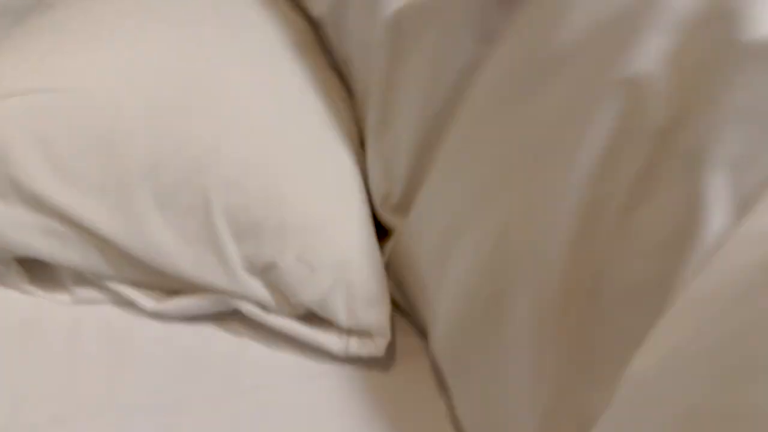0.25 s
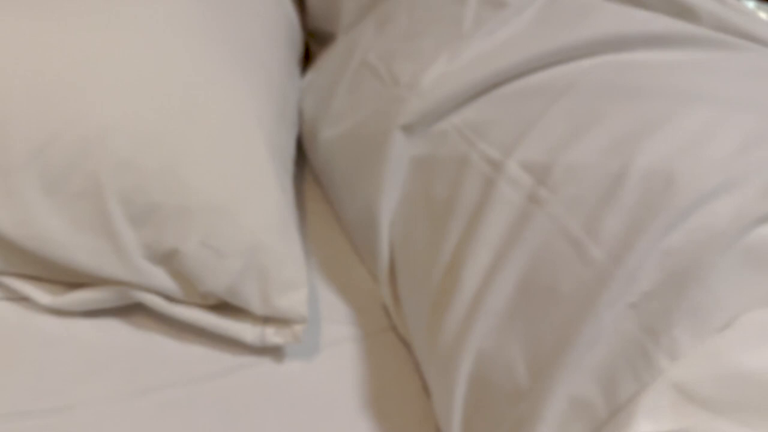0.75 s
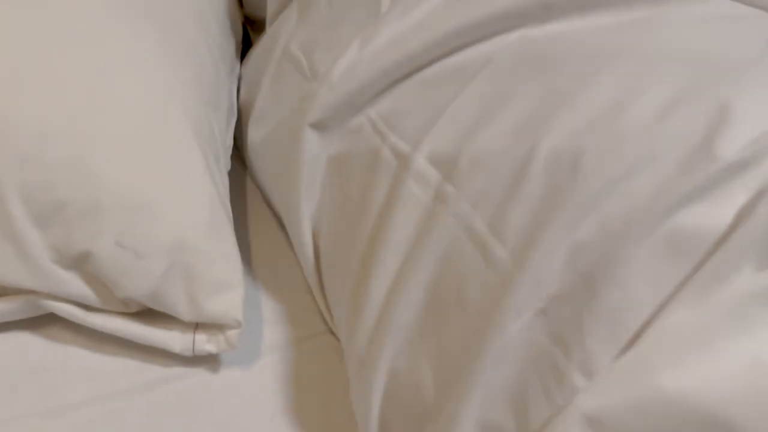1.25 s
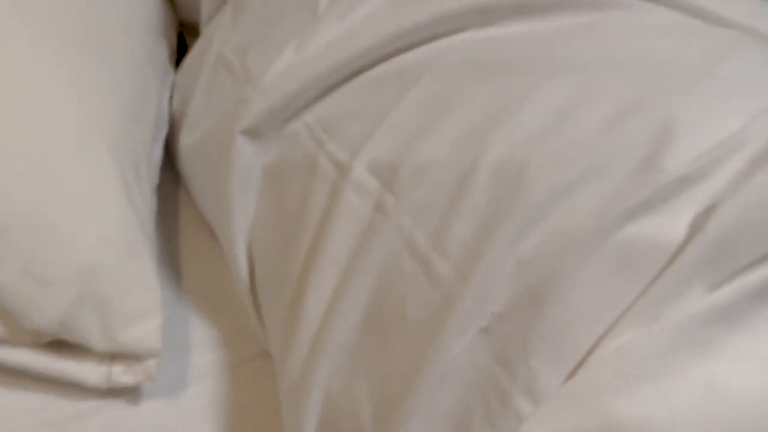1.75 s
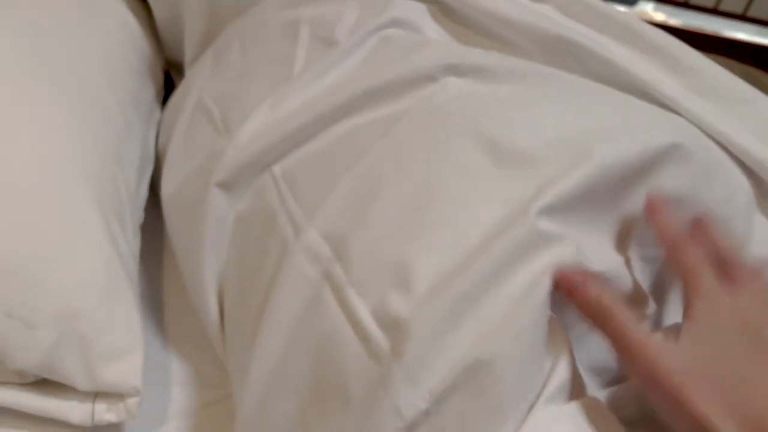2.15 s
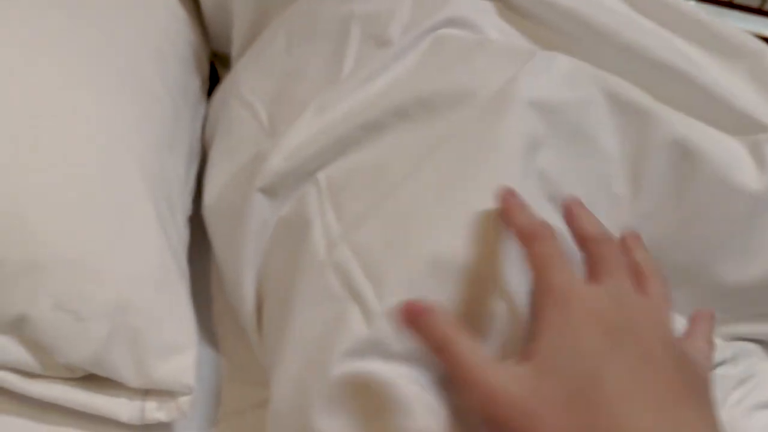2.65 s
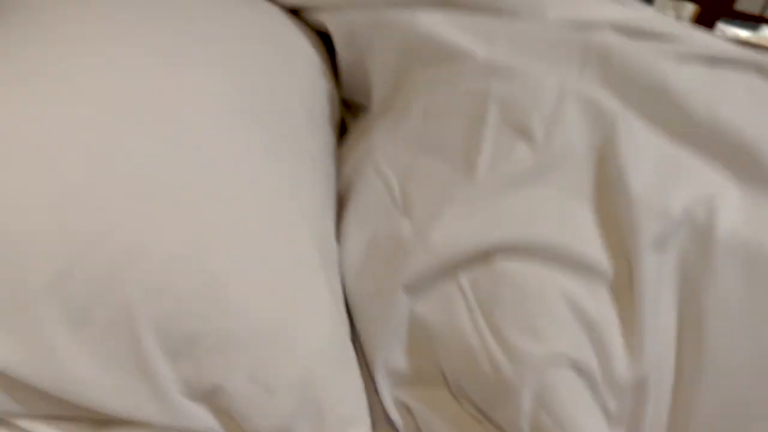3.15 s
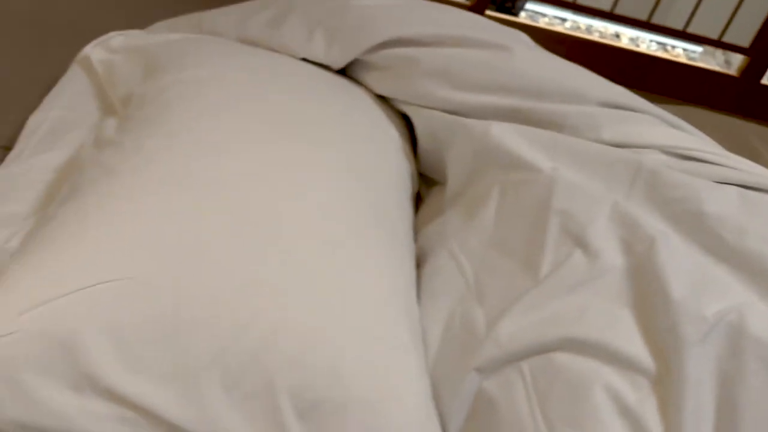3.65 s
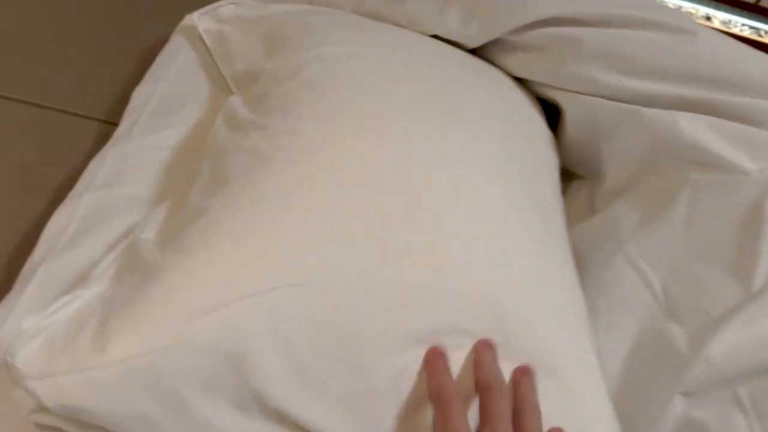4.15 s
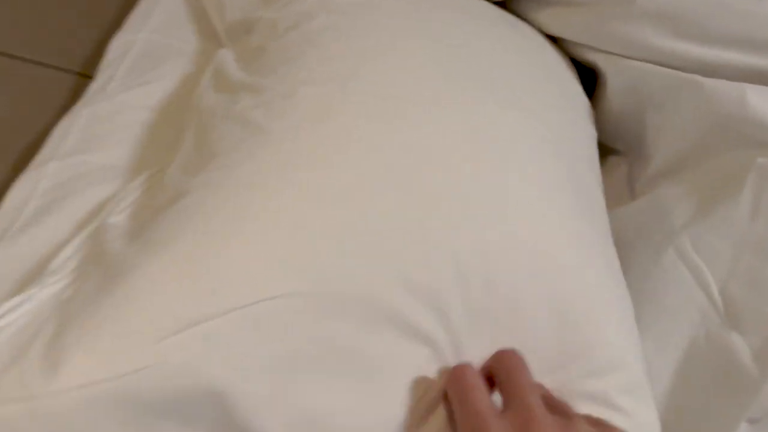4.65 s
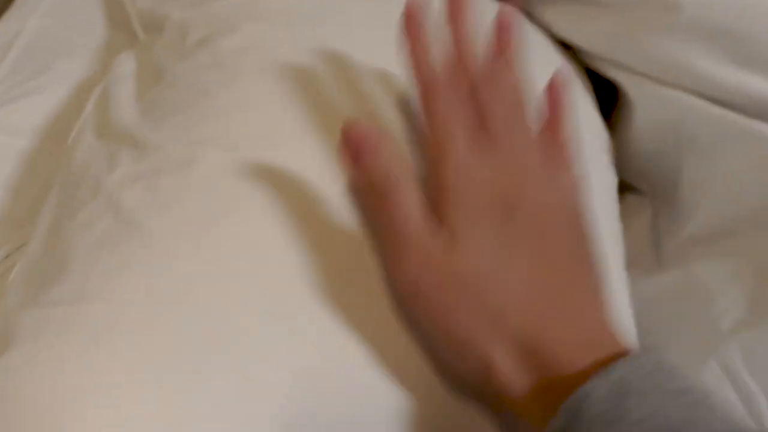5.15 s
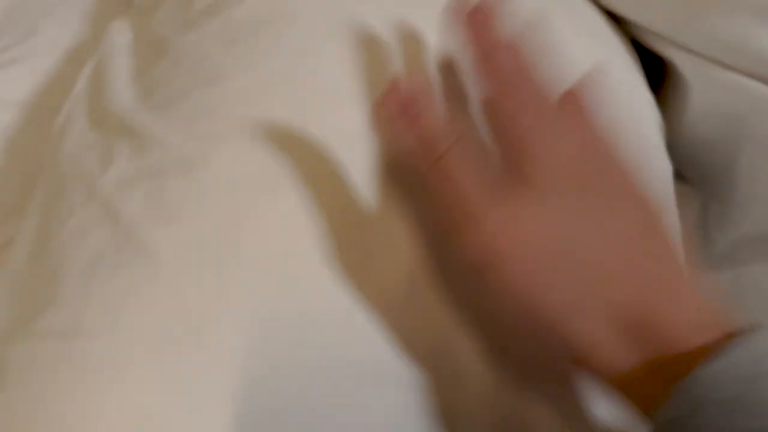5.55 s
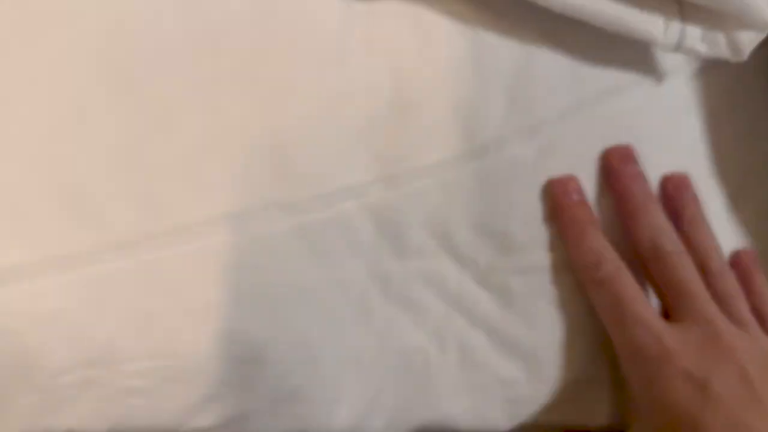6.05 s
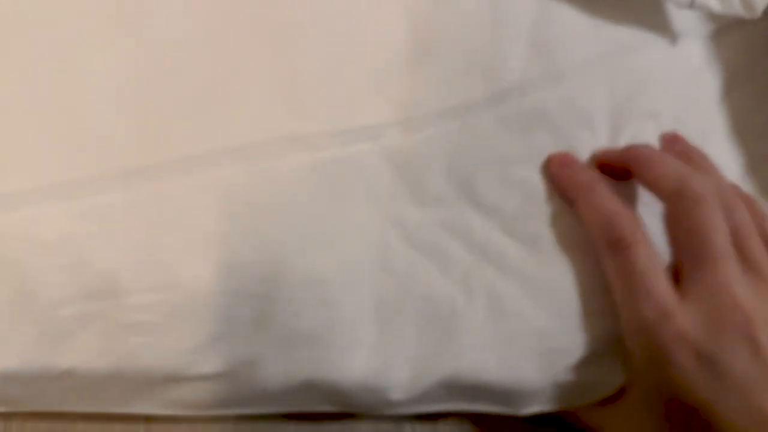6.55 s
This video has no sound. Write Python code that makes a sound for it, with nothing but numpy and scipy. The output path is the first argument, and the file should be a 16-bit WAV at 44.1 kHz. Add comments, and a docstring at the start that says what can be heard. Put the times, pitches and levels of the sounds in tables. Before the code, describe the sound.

Very close, dry stereo sound of bedding handled in a quiet room, over a soft low rumble. It opens with a muffled shove of the quilt and crisp cotton rustling, with small crease snaps until about 0.6 s. Lighter scrapes and faint low bumps continue to 1.6 s. At 1.9 s a cushioned pat thumps the quilt, followed by pressing strokes and duller thuds near 2.3, 2.75 and 3.1 s, with hissing cloth and crunching stuffing. Rustling thins around 3.5 to 4 s. Fingers brush the pillow from 4.2 s, and a tiny gliding squeak comes at 4.7 s. A soft low bump at 4.9 s leads to a hard slap at 5.2 s and the loudest at 5.4 s, deep, crackling and overloaded. Light rustle lingers, a small dull touch falls at 5.9 s, then from 6 s there is near silence with barely audible rubbing.

```python
"""In a quiet room, a hand pats and presses a quilt and a pillow close to a hand-held pair of microphones.
The cotton cover hisses and the stuffing crunches: both are random fibre slips, coloured band by band.
The palm and fingers land as damped knocks and a deep thump, creases snap, fingers brush and squeak, and
a low noise rumbles beneath. The hardest pat overloads the input; near the end all fades almost to silence."""
import sys
import numpy as np
from scipy import signal
from scipy.fft import rfft, irfft, next_fast_len
from scipy.io import wavfile

SR = 44100
rng = np.random.default_rng(int(sys.argv[2]) if len(sys.argv) > 2 else 0)


def store_wav(level_fs):
    """Save 16-bit WAV to argv[1]."""
    pcm = np.round(np.clip(np.atleast_2d(level_fs), -1, 1) * 32767)
    wavfile.write(sys.argv[1], SR, pcm.T.astype(np.int16))


N = 300321


def from_db(db):
    """Turn a level in dB into a gain."""
    return 10 ** (np.asarray(db) / 20)


def rms_one(x):
    """Scale a sound to an rms of 1."""
    return x / np.sqrt(np.mean(x ** 2) + 1e-20)


def in_time(rows):
    """Join the points of a table with straight lines; give each column one value per sample."""
    seconds, *columns = np.transpose(rows)
    return [np.interp(np.arange(N) / SR, seconds, column) for column in columns]


def at_hz(points, hz):
    """Read a table of (Hz, value) along a log-frequency axis."""
    table_hz, values = np.transpose(points)
    return np.interp(np.log(hz), np.log(table_hz + 1), values)


def drift(rate_hz):
    """Slow random wandering with an rms of 1, computed at every 40th sample and joined by lines."""
    r = np.exp(-80 * np.pi * rate_hz / SR)
    noise = rng.standard_normal(N // 40 + 2002)
    slow = signal.lfilter([1], [1, -2 * r, r * r], noise)[2000:]  # skip the start-up
    return np.interp(np.arange(N) / 40, np.arange(len(slow)), rms_one(slow))


def fibres(per_s):
    """Fibres slip at random moments with uneven force: sparse clicks in four unrelated streams."""
    slips = rng.random((4, N)) < per_s / SR
    return rms_one(rng.standard_normal((4, N)) * slips)


def coloured(streams, colour, patchy_db, patch_rate):
    """Half-octave bands, each with its own level, flicker and left-right likeness; rms 1 in all."""
    # How alike left and right are. Each row: frequency in Hz, likeness from 0 to 1.
    likeness = [(60, 0.99), (250, 0.84), (500, 0.23), (1000, 0.45), (2000, 0.21), (4000, 0.39),
                (8000, 0.32), (13000, 0.94)]
    out, together = 0, drift(patch_rate / 2)  # one drift is shared by all bands
    octaves = np.log2(colour[-1][0] / colour[1][0])
    edges = colour[1][0] * 2 ** np.arange(-1, octaves + .5, .5)
    edges = np.minimum(edges, .45 * SR)
    for k, (low, high) in enumerate(zip(edges, edges[1:])):
        band = signal.butter(2, [low, high], "band", fs=SR, output="sos")
        mid, side = signal.sosfilt(band, streams[k % 2::2])  # neighbouring bands use other streams
        hz = np.sqrt(low * high)
        alike = np.clip(at_hz(likeness, hz), 0, 1)
        flicker_db = patchy_db * (1.58 * together + drift(patch_rate))
        gain = from_db(at_hz(colour, hz) + flicker_db)
        out = out + gain * (np.sqrt(1 + alike) * mid + np.sqrt(1 - alike) * side * [[1], [-1]])
    return rms_one(out)


def knock(start_s, peak_db, hz, cycles, rise):
    """A damped swing: it builds over `rise` cycles and loses 60 dB in `cycles` cycles."""
    turn = np.arange(int(SR * .25)) / SR * hz
    swing = np.sin(2 * np.pi * turn) * (1 - np.exp(-turn / rise)) * from_db(-60 * turn / cycles)
    out, at = np.zeros(N), round(start_s * SR)
    out[at:at + len(swing)] = from_db(peak_db) * swing[:N - at] / np.max(np.abs(swing))
    return out


def strokes():
    """Power of hiss, crunch and bulk: every stroke rises, holds and falls, over faint settling."""
    # Strokes and presses. Each row: time of full strength in seconds, hold in seconds, rise in dB/s,
    # fall in dB/s, then levels in dB of cover hiss, stuffing crunch and muffled shifting of the bulk.
    presses = [(0, 0.0087, 200, 412, -44, -39.5, -27.5), (0.042, 0.13, 200, 53, -40.5, -38.5, -39.5),
               (0.286, 0.26, 22, 75, -43.5, -40.5, -38), (0.733, 0.024, 47, 64, -47, -72, -49),
               (0.923, 0.011, 65, 93, -47.5, -53, -43), (1.059, 0.086, 76, 67, -42, -47, -48),
               (1.208, 0.013, 600, 300, -59, -40, -38.5), (1.347, 0.03, 148, 63, -48, -46, -47),
               (1.52, 0.012, 80, 55, -49.5, -65, -45), (1.92, 0.064, 502, 320, -37.5, -32.5, -28),
               (2.057, 0.063, 120, 142, -42, -43, -39), (2.298, 0.02, 385, 133, -35.5, -35.5, -29),
               (2.5, 0.063, 71, 260, -41.5, -44.5, -41.5), (2.735, .025, 915, 84, -40, -37, -30.5),
               (2.895, 0.049, 116, 63, -37.5, -43, -37), (3.082, 0.041, 95, 134, -39.5, -35, -37.5),
               (3.16, 0.13, 97, 100, -49, -42, -46), (3.316, 0.23, 88, 110, -40.5, -44.5, -49),
               (3.74, .1, 86, 253, -45.5, -53, -42), (4.158, 0.01, 101, 175, -37.5, -42, -40.5),
               (4.22, 0.1, 80, 120, -46.5, -48, -48.5), (4.406, 0.058, 65, 305, -40, -38.5, -44),
               (4.635, .05, 150, 150, -44.5, -53, -63), (4.694, 0.015, 156, 203, -67, -44.5, -39),
               (4.84, 0.015, 71, 61, -45.5, -51, -52), (4.9, 0.13, 101, 150, -55.5, -50, -42),
               (5.223, 0.014, 300, 299, -46, -54, -33.5), (5.279, 0.0082, 154, 240.5, -42, -43, -37),
               (5.481, .015, 200, 219, -44, -45.5, -44), (5.52, 0.0081, 174, 79.5, -60.5, -59, -46.5),
               (5.93, 0.025, 451, 451, -50, -52, -45.5), (5.975, 0.025, 200, 211, -68.5, -85, -83),
               (6.243, .1, 900, 130, -87, -98, -74), (6.54, .04, 400, 17, -64, -71, -74)]
    # Faint rustle between strokes. Each row: time in seconds, crunch level in dB, hiss level in dB.
    settling = [(0, -57, -51), (.7, -47.5, -62), (1.5, -48, -70), (1.8, -50, -56.5), (2.55, -53.5, -65),
                (2.7, -49.5, -80), (3.7, -47, -78), (4.0, -50, -53.5), (4.6, -45.5, -53), (5.0, -46, -51),
                (5.35, -50, -55.5), (5.6, -57.5, -61.5), (5.88, -60, -69), (6.03, -64.5, -63),
                (6.07, -97, -96), (6.23, -102, -91), (6.5, -83.5, -73.5), (6.81, -77, -77)]
    now = np.arange(N) / SR
    crunch_db, hiss_db = in_time(settling)
    power = from_db([hiss_db, crunch_db, crunch_db]) ** 2  # the bulk settles as loudly as the crunch
    for s, hold, rise, fall, *levels_db in presses:
        before, after = np.maximum(s - now, 0), np.maximum(now - s - hold, 0)
        shape = from_db(-abs(rise) * before - abs(fall) * after)
        power += (from_db(levels_db)[:, None] * shape) ** 2
    return power


def slaps():
    """Skin slaps the cover: the power of each layer jumps, then dies away as air and fibres settle."""
    # Each row: start in seconds, hiss, crunch and bulk levels in dB, time to fall by 60 dB in seconds.
    hits = [(1.865, -49, -42.5, -30.5, 0.3), (1.884, -40, -32, -22, 0.19),
            (5.1765, -37.5, -22, -18.5, 0.11), (5.1858, -31, -11.5, -27, 0.025),
            (5.191, -37.5, -26, -29, 0.12), (5.382, -39, -23.5, -28, 0.076), (5.389, -20.5, -9, -18, 0.046),
            (5.394, -36, -34, -13.5, 0.27), (5.904, -60.5, -56, -40.5, 0.099)]
    power, now = np.zeros((3, N)), np.arange(SR // 2) / SR
    for s, *levels_db, t60 in hits:
        at = round(s * SR)
        power[:, at:at + SR // 2] += from_db(np.array(levels_db)[:, None] - 60 * now / t60) ** 2
    return power


def cover_hiss():
    """Dense slips of the cotton weave, heard as hiss."""
    # Colour of the hiss. Each row: frequency in Hz, relative level in dB per Hz.
    colour = [(900, -19), (1500, -9.5), (2900, -7.5), (4800, -11), (6400, -4.5), (8200, -18), (11000, -8),
              (14000, -18.5), (17000, -6.5)]
    return coloured(fibres(per_s=20000), colour, patchy_db=0.7, patch_rate=8.5)


def stuffing_crunch():
    """Sparser slips of the stuffing, heard as crunching."""
    # Colour of the crunch. Each row: frequency in Hz, relative level in dB per Hz.
    colour = [(250, -20.5), (380, -2.5), (600, 1.5), (900, -1), (1300, -2.5), (2000, -9), (3000, -17),
              (4200, -18)]
    return coloured(fibres(per_s=4600), colour, patchy_db=1.5, patch_rate=14.0)


def bulk_shifting():
    """The bulk of the bedding shifts: muffled low noise."""
    # Colour of the shifting. Each row: frequency in Hz, relative level in dB per Hz.
    colour = [(70, -17), (100, 6), (160, 2), (250, 0), (330, -2.5), (480, -9.5), (700, -16.5)]
    return coloured(rng.standard_normal((4, N)), colour, patchy_db=1.0, patch_rate=12.0)


def blows():
    """Each soft blow pushes inward and wakes the ringing tones (modes) near its own pitch."""
    # Palm blows are deep, finger blows higher. Each row: start in seconds, level in dB, pitch in Hz.
    hits = [(0.986, -27, 68), (1.507, -29, 118), (1.887, -18.5, 330), (1.893, -14, 170), (1.904, -20, 124),
            (2.285, -22, 230), (2.298, -18, 280), (2.617, -25, 90), (2.7444, -19, 205), (3.088, -21.5, 122),
            (3.84, -28, 68), (4.15, -29, 740), (4.886, -20, 65), (5.1767, -9.5, 520), (5.1815, 1, 259.3),
            (5.186, -10, 325), (5.196, -18, 190), (5.204, -13.5, 66), (5.386, -7.5, 522), (5.39, -5.5, 780),
            (5.393, 1, 300), (5.4, 6.5, 80.5), (5.439, -21.5, 120), (5.904, -44.5, 200),
            (5.929, -28.5, 79.6)]
    # What hand and bedding ring with. Each row: frequency in Hz, relative level in dB,
    # time to fall by 60 dB in cycles.
    modes = [(65.06, 0, 7.0), (80, -5, 6.5), (120, 2, 4.9), (170.3, 4, 2.9), (215, 2, 10), (257, 0, 2),
             (320, -1, 7.8), (330, -15.5, 50), (561.6, -1.5, 9.7), (763, -0.5, 20)]
    reach_octaves = .22
    out = np.zeros(N)
    for s, peak_db, pitch_hz in hits:
        for hz, level_db, cycles in modes:
            share = np.exp(-(np.log2(hz / pitch_hz) / reach_octaves) ** 2)
            if share > .02:  # leave out modes too far away
                out -= share * knock(s, peak_db + level_db, hz, cycles, rise=.3)
    return out


def snaps():
    """Creases snap: short, quickly damped tones."""
    # Each row: start in seconds, peak level in dB, frequency in Hz.
    creases = [(0.213, -24, 1650), (0.301, -29, 1180), (0.363, -27, 1220), (0.495, -30, 1010),
               (.589, -27, 1230), (1.199, -26.5, 1440), (1.923, -31, 1220), (2.436, -31.5, 885),
               (2.481, -34.5, 1170), (2.725, -28, 885), (3.069, -23.5, 1170), (3.255, -26, 1110),
               (3.33, -27.5, 1230), (3.353, -26, 1250), (3.432, -28.5, 940), (4.84, -23, 3830),
               (5.187, -32, 2250), (5.3908, -9.5, 2200), (5.773, -45, 1000)]
    return sum(knock(*row, cycles=7.7, rise=0.2) for row in creases)


def brushes():
    """Fingertips brush the weave: each stroke swells and fades in its own band of noise."""
    # Each row: start in seconds, length in seconds, centre in Hz, band width in Hz,
    # level in dB before the swell.
    touches = [(4.284, 0.32, 1550, 1370, -47.5), (4.648, 0.013, 1960, 400, -41.5),
               (4.581, 0.11, 6260, 1300, -51.5), (4.747, 0.42, 7000, 1470, -56),
               (6.226, .15, 521, 480, -66), (6.528, 0.11, 908, 448, -64.5), (6.687, 0.11, 806, 501.4, -73)]
    out = np.zeros((2, N))
    for s, length, hz, width_hz, level_db in touches:
        at, size = round(s * SR), round(length * SR)
        band = signal.butter(2, [hz - width_hz / 2, hz + width_hz / 2], "band", fs=SR, output="sos")
        mid, side = signal.sosfilt(band, rng.standard_normal((2, SR // 2)))[:, :size]
        swell = np.sqrt(np.sin(np.pi * np.arange(size) / size))
        stroke = rms_one(mid + 0.43 * side * [[1], [-1]]) * swell
        out[:, at:at + size] += from_db(level_db) * stroke[:, :N - at]
    return out


def squeak():
    """Fingers stick and slip off the cover: two gliding tones, scattered by uneven slips."""
    # Glide of the squeak. Each row: time in seconds, frequency in Hz, level in dB.
    glide = [(4.678, 600, -55), (4.686, 727, -23.5), (4.689, 897, -55), (4.693, 1213, -22.5),
             (4.699, 1520, -28), (4.702, 1640, -35), (4.707, 1560, -36), (4.714, 1236, -30),
             (4.725, 1000, -46)]
    hz, level_db = in_time(glide)
    # silent until the level rises above that of the first row, and after the last row
    sounding = (level_db > glide[0][2]) & (np.arange(N) / SR < glide[-1][0])
    slips = rms_one(signal.lfilter([1], [1, -.94], rng.standard_normal((3, N))))
    turn = 2 * np.pi * np.cumsum(hz) / SR
    first = (.9 + .45 * slips[0]) * np.sin(turn) + .45 * slips[1] * np.cos(turn)
    second = .55 * slips[2] * np.sin(1.4 * turn)
    return sounding * from_db(level_db) * (first + second)


def rumble():
    """Low noise whose level wanders slowly and sinks near the end."""
    # Course of the rumble. Each row: time in seconds, level in dB.
    course = [(0.0, -34), (0.4, -38), (0.8, -42), (1.6, -36), (1.86, -39), (2.1, -39.5), (2.6, -42.5),
              (2.9, -37), (4.0, -38.5), (4.6, -40.5), (5.04, -35.5), (5.4, -41), (5.6, -38.5), (5.86, -50),
              (6.0, -85), (6.26, -77), (6.47, -74), (6.81, -72)]
    # Colour of the rumble. Each row: frequency in Hz, relative level in dB per Hz.
    colour = [(13, -42.5), (22, -8.5), (32, -6), (54, 6.5), (97, 1.5), (129, -20), (250, -24), (320, -52),
              (550, -120)]
    level_db, = in_time(course)
    noise = coloured(rng.standard_normal((4, N)), colour, patchy_db=-0.5, patch_rate=4.7)
    return from_db(level_db) * noise


def scene():
    """Add up the sounds of hand and bedding and the rumble."""
    hiss_gain, crunch_gain, bulk_gain = np.sqrt(strokes() + slaps())
    hiss = hiss_gain * cover_hiss()
    crunch = crunch_gain * stuffing_crunch()
    bulk = bulk_gain * bulk_shifting()
    return hiss + crunch + bulk + blows() + snaps() + brushes() + squeak() + rumble()


def record(dry):
    """Two microphone ports differ in phase and level and ring in the treble; the input clips flat."""
    # Each row: frequency in Hz, phase in radians by which the left port leads the right.
    port_phase = [(0, 0), (1550, -1.0), (2500, 0.1), (3190, 1.6), (4820, 0.6), (5680, -1.5), (6720, 1.4),
                  (7060, 1.8), (8010, 2.7), (9130, 1.6), (11100, 0.1), (13000, -0.0), (13900, -0.9),
                  (15200, -1.9)]
    # Each row: frequency in Hz, left level over right level in dB.
    port_balance = [(60, 2), (130, 0), (290, 0), (640, -1), (1410, 0.5), (3100, 1.0), (6820, 4),
                    (15000, -2)]
    ring_hz, ring_width_hz, ring_db = 10130, 2100, -4.5
    cutoff_hz = 15740
    size = next_fast_len(N + 4096)
    hz = np.arange(size // 2 + 1) * SR / size
    # each port takes half of the difference, in opposite directions
    phase = np.exp(.5j * np.interp(hz, *np.transpose(port_phase)))
    half = phase * from_db(at_hz(port_balance, hz + 1) / 2)
    ring = 1 + from_db(ring_db) / (1 + (2 * (hz - ring_hz) / ring_width_hz) ** 2)
    ports = irfft(rfft(dry, size) * ring * [half, 1 / half], size)[:, :N]
    clipped = np.clip(ports, -1, 1)
    top_cut = signal.ellip(18, .05, 60, cutoff_hz, fs=SR, output="sos")
    return signal.sosfilt(top_cut, clipped)


dry = scene()
out = record(dry)
store_wav(out)
```